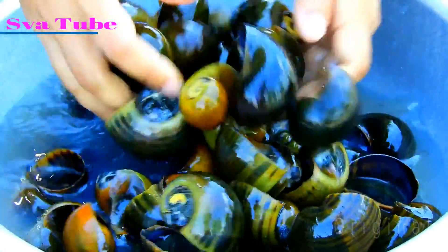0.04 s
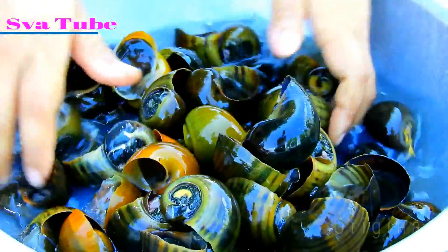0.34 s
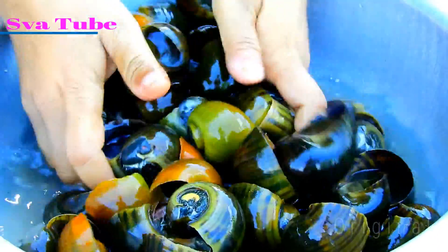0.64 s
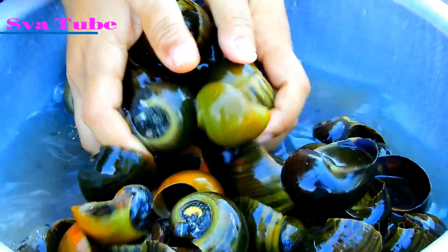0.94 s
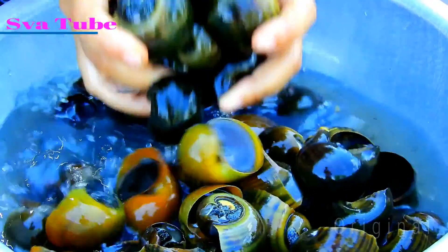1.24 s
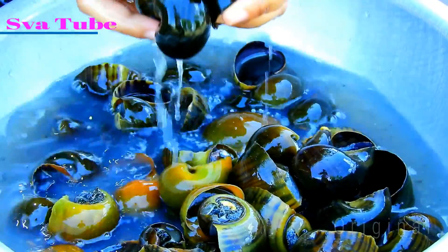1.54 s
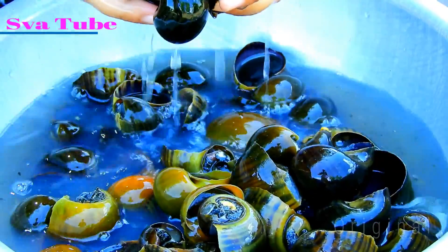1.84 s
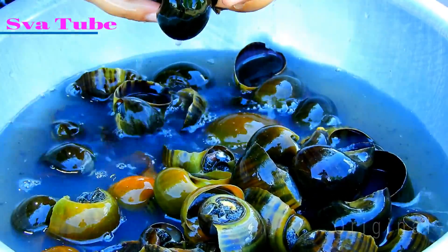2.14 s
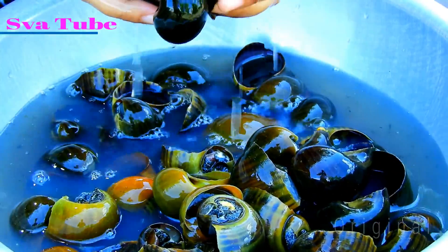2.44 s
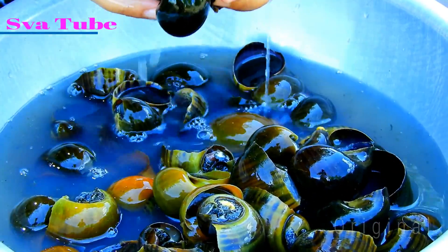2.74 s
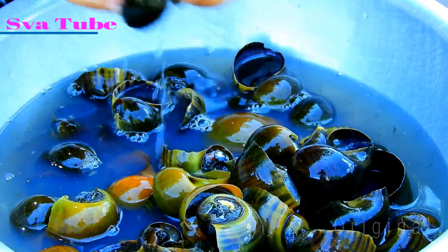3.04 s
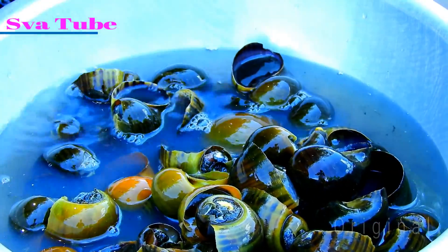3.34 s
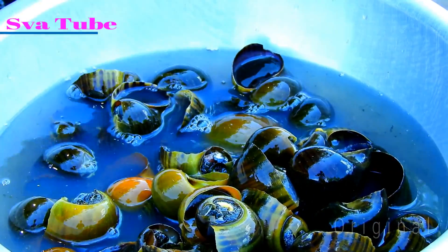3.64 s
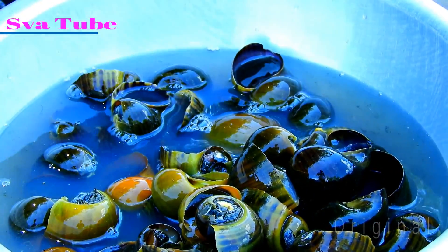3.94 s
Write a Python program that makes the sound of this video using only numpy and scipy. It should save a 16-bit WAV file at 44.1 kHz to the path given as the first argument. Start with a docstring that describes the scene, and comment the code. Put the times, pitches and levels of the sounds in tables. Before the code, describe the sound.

Hollow snail shells clatter in sloshing water as hands scoop through a plastic tub, heard close up outdoors. Light drips follow, a small bird chirps faintly, and the shells drop back in, splashing, rattling and thudding against the tub.

```python
"""Snails churned in a tub

Two hands churn large snails in a plastic tub of water: hollow shells knock, rims tick, water sloshes.
A handful is lifted and drips, then falls back; the shells tumble and the tub wall thuds.
Behind: outdoor hush, a faint far call and a small bird chirping just before the fall."""
import sys
import numpy as np
from scipy import signal
from scipy.fft import rfft, irfft, next_fast_len
from scipy.io import wavfile
from scipy.ndimage import uniform_filter1d

SR = 44100
rng = np.random.default_rng(int(sys.argv[2]) if len(sys.argv) > 2 else 0)


def master_out(mix):
    """Clip the mix to full scale and print it as 16-bit PCM to the path in sys.argv[1]."""
    frames = np.transpose(np.atleast_2d(mix))
    ceiling = np.clip(frames, -1, 1)
    pcm = np.round(ceiling * 32767).astype(np.int16)
    wavfile.write(sys.argv[1], SR, pcm)


N = 176400
T = np.arange(N) / SR

# hands gather and lift the shells: t/s, slosh/dB, knock/dB, tick/dB
SCOOP_LEVELS = [(0.026, -32.5, -23.5, -28), (0.031, -37.5, -17, -19), (0.085, -28.5, -18.5, -20.5),
                (0.108, -35.5, -27.5, -29), (0.132, -33, -15.5, -19.5), (0.208, -29.5, -17, -18.5),
                (0.252, -46, -31.5, -37.5), (0.342, -40, -31.5, -35.5), (0.352, -37, -26.5, -30.5),
                (0.552, -33.5, -20.5, -25), (0.584, -32.5, -15, -21.5), (0.67, -47, -33, -39),
                (0.834, -43.5, -31.5, -34), (0.858, -33.5, -19, -22.5), (0.965, -39, -29, -34),
                (1.044, -40.5, -29, -38), (1.08, -39, -22.5, -26), (1.106, -40.5, -30.5, -35),
                (1.236, -40, -27.5, -29.5), (1.348, -53, -41.5, -47.5), (1.372, -38, -33, -34.5),
                (1.42, -52, -47.5, -56)]
# handful falls back and tumbles: t/s, slosh/dB, knock/dB, tick/dB
TUMBLE_LEVELS = [(3.507, -75, -53, -46), (3.519, -43, -34, -28.5), (3.534, -18.5, -13, -29),
                 (3.56, -33.5, -31, -30.5), (3.606, -40, -38.5, -42), (3.67, -30.5, -27, -29.5),
                 (3.72, -23.5, -19, -21.5), (3.738, -39, -31, -34), (3.775, -27, -26.5, -25),
                 (3.885, -28, -22, -22.5), (3.932, -36, -34.5, -38), (3.998, -45, -50, -49.5)]
# tub and shell resonances per movement: f/Hz, gain/dB
SCOOP_SPECTRUM = [(71, -57), (120, -29.5), (186, -15), (251, -30.5), (318, -20.5), (524, -22), (665, -9.5),
                  (765, -15.5), (1010, 1), (1390, -7), (1990, -1.5), (3400, -13), (3910, -17), (4680, -8),
                  (5710, -13.5), (9400, -14), (14000, -50)]
TUMBLE_SPECTRUM = [(71, -48), (120, -18.5), (195, -4), (277, -10), (438, -1.5), (556, -10.5), (679, 0),
                   (812, -5), (1030, 6), (1340, -8), (1570, 1.5), (1760, -6.5), (2630, -4.5), (2900, -15),
                   (3690, -12), (6700, -20), (8860, -15), (14000, -51.5)]
# hollow knocks, shell on shell or water: t/s, level/dB, f/Hz
SHELL_KNOCKS = [(.047, 0.5, 910), (.311, -14, 980), (.462, -5, 1020), (.476, -2.5, 915), (.5825, 4.5, 1250),
                (.626, -7, 2400), (.6725, -5.5, 1590), (.683, -7, 1420), (.756, -5.5, 1080),
                (.840, -2, 1010), (.865, -3, 1190), (.895, -1.5, 1420), (.908, -2, 1040), (.928, -4, 2300),
                (.951, -3, 1010), (1.0783, 4, 1100), (1.295, -18, 1080), (1.3675, -10.5, 2600),
                (1.371, -21, 1200), (3.5325, 4.5, 1200), (3.711, -16, 1080), (3.951, -16, 1060),
                (3.982, -16.5, 1080)]
# sharp clicks of shell rims: t/s, level/dB, f/Hz
RIM_CLICKS = [(.083, -9, 7560), (.209, -8.5, 6000), (.258, -19, 8800), (.3117, -14.5, 5030),
              (.3475, -14.5, 5400), (.463, -9.5, 5030), (.950, -9, 7290), (1.0475, -17.5, 8950),
              (1.0785, -22, 7700), (1.3665, -13, 6500), (3.5325, -15.5, 8240), (3.583, -24, 7900),
              (3.614, -10.5, 4670), (3.630, -15.5, 8700), (3.673, -12, 9000), (3.7443, -9.5, 8700),
              (3.932, -28, 4900)]
# drips from the lifted handful: t/s, level/dB, f/Hz
HANDFUL_DRIPS = [(1.425, -31, 8800), (1.4577, -27, 1170), (1.466, -32, 3660), (1.511, -31, 2290),
                 (1.542, -29.5, 1500), (1.585, -36, 1570), (1.611, -26, 414), (1.6175, -33, 4950),
                 (1.712, -32, 1530), (1.7505, -28.5, 6740), (1.766, -32, 5200), (1.800, -31.5, 4630),
                 (1.8284, -38.5, 4600), (1.855, -36, 4940), (1.989, -33.5, 6230), (2.506, -33, 4500)]
# heavy blows on the tub wall: t/s, level/dB
WALL_BLOWS = [(.581, -34), (1.0803, -33), (3.532, -23.5)]
# small bird: t/s, length/s, top f/Hz, level/dB
BIRD_CHIRPS = [(3.264, 0.047, 4800, -46), (3.381, 0.037, 5490, -36), (3.460, 0.027, 4650, -44.5)]
# far call: t/s, length/s, top f/Hz, level/dB
DISTANT_CALLS = [(2.84, 0.094, 867, -47.5)]
# outdoor hush envelope: t/s, level/dB
HUSH_ENVELOPE = [(1.57, -51), (2.1, -50), (2.55, -46), (3.4, -46)]
# outdoor hush spectrum: f/Hz, density/dB
HUSH_SPECTRUM = [(15, -44), (25, -18), (69, -3), (198, -2), (523, -12), (848, -8), (1500, -12), (2800, -16),
                 (9050, -17.5), (15500, -42)]


def churn(rows, spectrum, pan_db):
    """One movement of the heap: water gulps low, shell cavities knock mid, rims and spray tick on top."""
    times_s, *levels_db = np.transpose(rows)
    active = (T >= times_s[0] - .03) & (T <= times_s[-1] + .002)
    force = slip_force(np.count_nonzero(active))
    water = in_tub(grains(force, 147, 670, per_s=1200, spread_db=3, cycles=5.7, pan_db=4), -17)
    shells = in_tub(grains(force, 790, 2867, per_s=1100, spread_db=1, cycles=22.5, pan_db=3.5), -8.5)
    rims = in_tub(grains(force, 3190, 13970, per_s=2700, spread_db=2, cycles=12.6, pan_db=6), -2.5)
    out = np.zeros((2, N))
    for layer, db in zip((water, shells, rims), levels_db):
        envelope = from_db(np.interp(T[active], times_s, db))
        out[:, active] += envelope * levelled(resonances(layer, spectrum))
    return out * from_db(pan_db * np.array([[.5], [-.5]]))


def slip_force(length, slips_per_s=60, decay_s=0.0031):
    """Contact force: a steady push plus jolts as the heap slips."""
    slips = (rng.random(length) < slips_per_s / SR) * rng.uniform(0.32, 1.63, length)
    return 1 + 1.56 * signal.lfilter([1], [1, -np.exp(-1 / (decay_s * SR))], slips)


def grains(force, low_hz, high_hz, per_s, spread_db, cycles, pan_db, pitches=28):
    """Random small contacts, each ringing at one of many pitches from its own place in the tub."""
    length = len(force)
    out = np.zeros((2, length))
    for hz in np.geomspace(low_hz, high_hz, pitches):
        at = np.flatnonzero(rng.random(length) < per_s / pitches / SR)
        size_db = spread_db * np.minimum(rng.exponential(1, length)[at], 3)
        place_db = pan_db * rng.standard_normal(length)[at] * [[.5], [-.5]]
        impulses = np.zeros((2, length))
        impulses[:, at] = (-1.) ** at * force[at] * from_db(size_db + place_db)
        out += unit_rms(ring(impulses, hz, cycles)) * np.sqrt(hz)
    return bandpass(out, low_hz / 1.4, high_hz * 0.97)


def ring(impulses, hz, cycles):
    """Each impulse rings a sine that falls 60 dB in the given cycles."""
    radius, step_rad = 1000 ** (-hz / (cycles * SR)), 2 * np.pi * hz / SR
    feedback = [1, -2 * radius * np.cos(step_rad), radius * radius]
    return signal.lfilter([1, 0, -1], feedback, impulses + 1e-18) / 2


def resonances(x, spectrum):
    """Tub and shell resonances as a minimum-phase filter."""
    size = 2 * next_fast_len(x.shape[1])
    cepstrum = irfft(np.log(bin_gains(spectrum, size)), size)
    cepstrum[1:size // 2] *= 2
    cepstrum[size // 2 + 1:] = 0
    return irfft(rfft(x, size) * np.exp(rfft(cepstrum)), size)[:, :x.shape[1]]


def hits(rows, t60_1khz_s, crack_db, crack_t60_s, crack_hz):
    """Single contacts: damped ring plus wet crack. Higher pitch: shorter ring, stronger crack."""
    out, t = np.zeros(N + SR), T[:SR // 10]
    for start_s, db, hz in rows:
        t60_s = t60_1khz_s * np.sqrt(1000 / hz)
        swing = np.sin(2 * np.pi * hz * t) * from_db(-60 * t / t60_s) * (1 - np.exp(-2 * t * hz))
        body = np.gradient(swing) * SR / (2 * np.pi * hz)
        noise = unit_rms(bandpass(rng.standard_normal(len(t)), *crack_hz))
        crack = noise * from_db(crack_db - 60 * t / crack_t60_s) * np.sqrt(hz / crack_hz[0])
        i = int(start_s * SR)
        out[i:i + len(t)] += from_db(db) * (body + crack)
    return np.array([out[:N], out[:N]])


def with_droplets(drips, below_hz=3000, within_s=0.031, mean_db=-10.5, scatter_oct=0.53):
    """Low drips hit water and throw three softer droplets; high ones only tick on shell."""
    rows = list(drips)
    for start_s, db, hz in drips:
        if hz < below_hz:
            for late, detune in rng.uniform([0, -1], 1, (3, 2)):
                droplet_hz = hz * 2 ** (scatter_oct * detune)
                rows.append((start_s + within_s * late, db + mean_db * (.5 + late), droplet_hz))
    return rows


def wall_thuds(wall_hz=196, t60_s=0.1, push_db=-12, push_s=0.00087):
    """A heavy blow pushes the tub wall once and leaves it ringing."""
    out = np.zeros(N)
    for start_s, db in WALL_BLOWS:
        t = np.maximum(T - start_s, 0)
        push = from_db(push_db) * t / push_s * np.exp(1 - t / push_s)
        wall = np.sin(2 * np.pi * wall_hz * t) * from_db(-60 * t / t60_s)
        out += from_db(db) * (wall + push)
    return out


def in_tub(x, side_db, t60_s=0.036, wet_db=-4, gap_s=.002):
    """Adds short reflections from wall and shells; the pattern changes as the heap shifts."""
    t, hop, length = T[:SR // 16], SR // 25, x.shape[1]
    wet = np.zeros((2, length + SR))
    for centre in range(0, length + hop, hop):
        i, j = max(centre - hop, 0), min(centre + hop, length)
        tail = stereo_noise(len(t), side_db) * from_db(-60 * t / t60_s) * (t > gap_s)
        tail /= np.sqrt(np.sum(tail ** 2) / 2)
        frame = x[:, i:j] * np.cos(np.pi / 2 * (np.arange(i, j) - centre) / hop)
        wet[:, i:j + len(t) - 1] += signal.fftconvolve(frame, tail, axes=1)
    return x + from_db(wet_db) * wet[:, :length]


def calls(rows, arch, rough):
    """Wavering whistles; pitch starts and ends below its top by the fraction arch."""
    out = np.zeros(N)
    for start_s, length_s, top_hz, db in rows:
        progress = np.clip((T - start_s) / length_s, 0, 1)
        waver = unit_rms(uniform_filter1d(rng.standard_normal(N), 60))
        hz = top_hz * (1 - arch * (2 * progress - 1) ** 2 + rough * waver)
        out += from_db(db) * np.sin(np.pi * progress) * np.sin(2 * np.pi * np.cumsum(hz) / SR)
    return np.array([out, out])


def hush():
    """Outdoor background: low rumble, soft hiss."""
    noise = irfft(rfft(stereo_noise(N, side_db=-5)) * bin_gains(HUSH_SPECTRUM, N), N)
    return unit_rms(noise) * from_db(np.interp(T, *np.transpose(HUSH_ENVELOPE)))


def from_db(db):
    return 10 ** (np.asarray(db) / 20)


def unit_rms(x):
    return x / np.sqrt(np.mean(x ** 2) + 1e-20)


def levelled(x, window_s=0.031):
    """Running rms held at 1; single grains survive."""
    power = uniform_filter1d(np.mean(x ** 2, axis=0), int(window_s * SR) + 1)
    return x / np.sqrt(np.maximum(power, 0) + 1e-12)


def bin_gains(spectrum, size):
    """Gain per FFT bin, interpolated in dB over log f."""
    hz, db = np.transpose(spectrum)
    bin_hz = np.maximum(np.arange(size // 2 + 1) * SR / size, 1)
    return from_db(np.interp(np.log(bin_hz), np.log(hz), db))


def bandpass(x, low_hz, high_hz):
    return signal.sosfilt(signal.butter(2, [low_hz, high_hz], "band", fs=SR, output="sos"), x + 1e-18)


def stereo_noise(length, side_db):
    mid, side = rng.standard_normal((2, length))
    return mid + from_db(side_db) * side * [[1], [-1]]


def scene():
    """Heap, single contacts, drips, wall thuds, calls and hush."""
    heap = churn(SCOOP_LEVELS, SCOOP_SPECTRUM, pan_db=-0.74)
    heap += churn(TUMBLE_LEVELS, TUMBLE_SPECTRUM, pan_db=2.0)
    knocks = hits(SHELL_KNOCKS, t60_1khz_s=.008, crack_db=-14.5, crack_t60_s=.013, crack_hz=(925, 2100))
    clicks = hits(RIM_CLICKS, t60_1khz_s=.011, crack_db=-8.5, crack_t60_s=.02, crack_hz=(4360, 10500))
    drops = with_droplets(HANDFUL_DRIPS)
    drips = hits(drops, t60_1khz_s=.016, crack_db=-7.5, crack_t60_s=.016, crack_hz=(4400, 10400))
    contacts = in_tub(knocks, side_db=-7) + in_tub(clicks + drips, side_db=-2)
    contacts = signal.sosfilt(signal.butter(5, 10000, "low", fs=SR, output="sos"), contacts)
    whistles = calls(BIRD_CHIRPS, arch=.29, rough=.03) + calls(DISTANT_CALLS, arch=.084, rough=.13)
    return heap + contacts + wall_thuds() + in_tub(whistles, side_db=-5) + hush()


def record(dry):
    """Peak clip, then steep low-pass."""
    ceiling, stop_hz = .95, 16250
    lowpass = signal.cheby2(14, 60, stop_hz, fs=SR, output="sos")
    return signal.sosfilt(lowpass, np.clip(dry, -ceiling, ceiling))


dry = scene()
out = record(dry)
master_out(out)
```